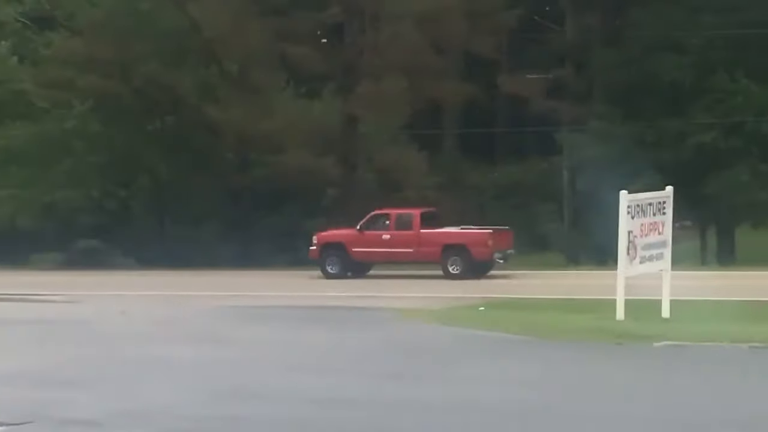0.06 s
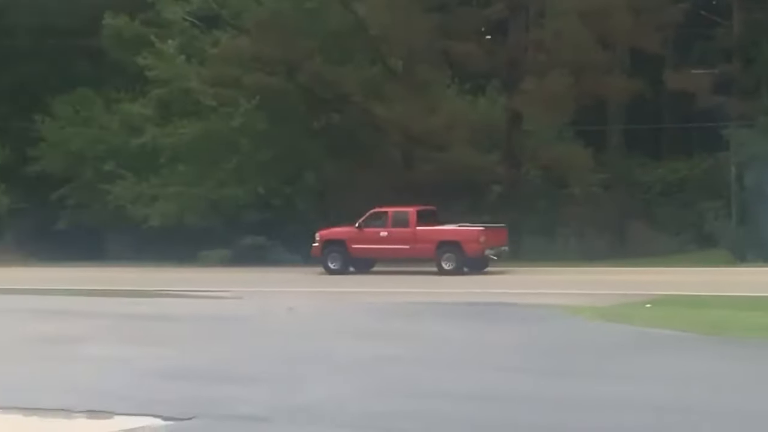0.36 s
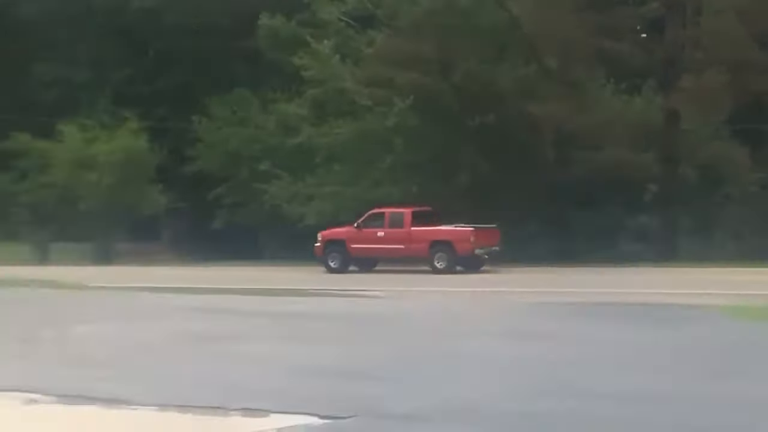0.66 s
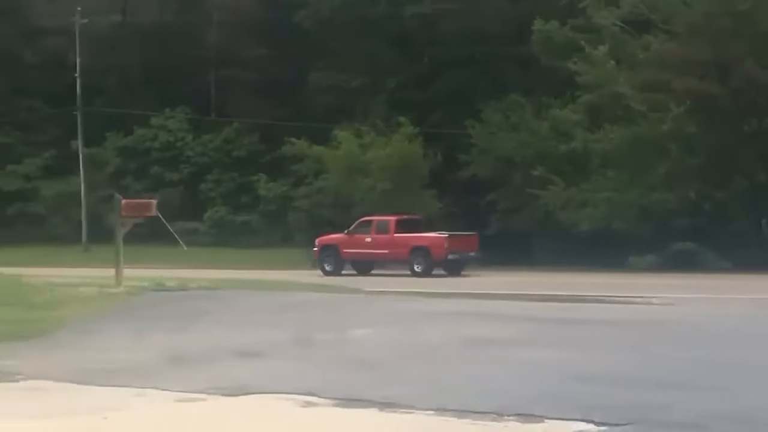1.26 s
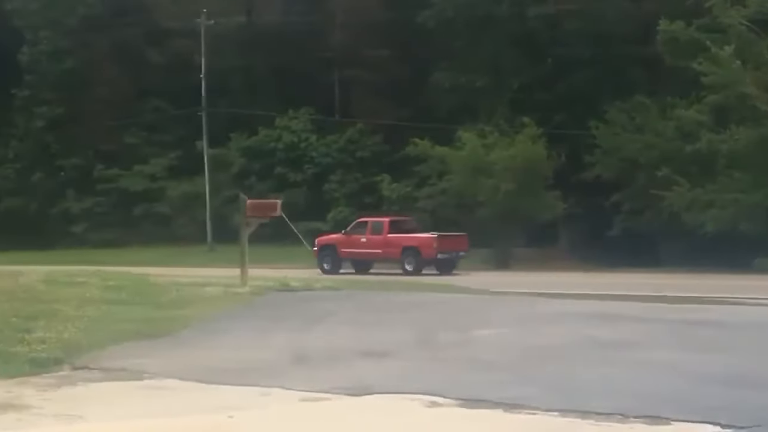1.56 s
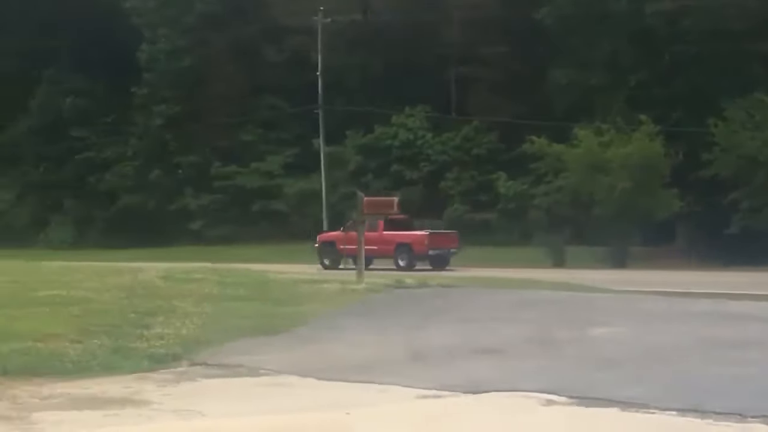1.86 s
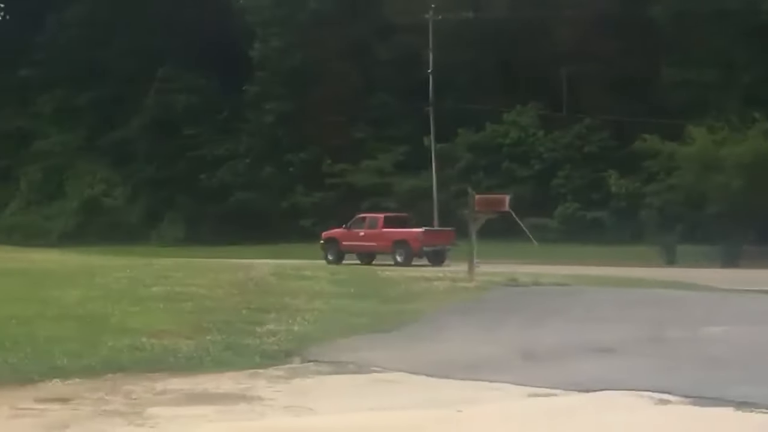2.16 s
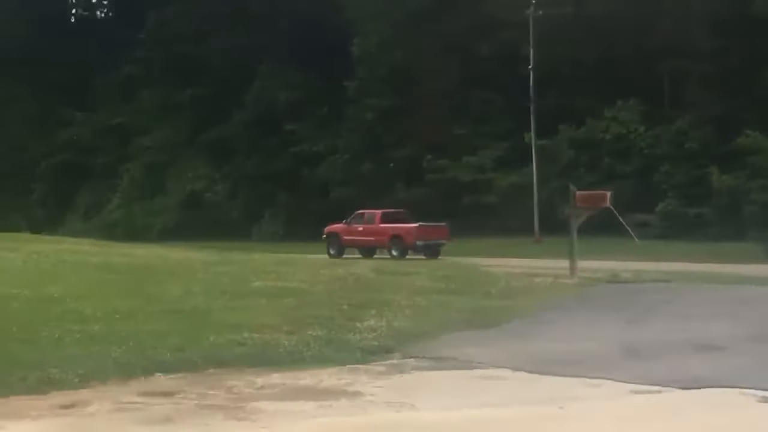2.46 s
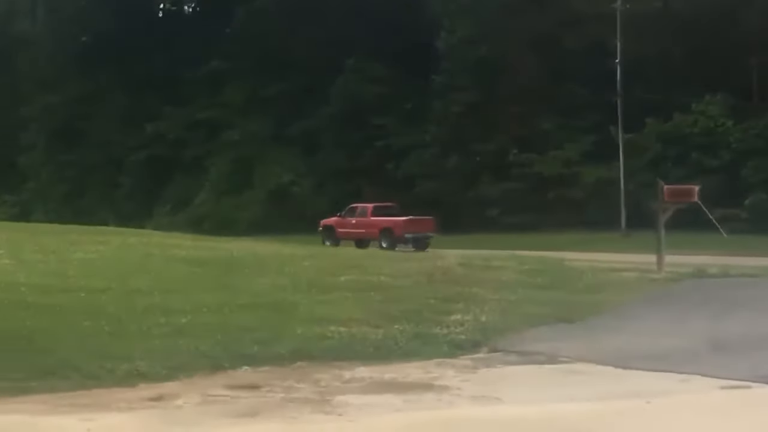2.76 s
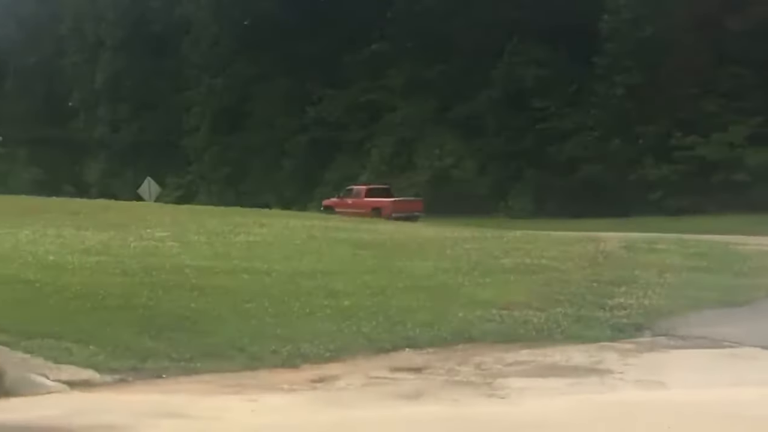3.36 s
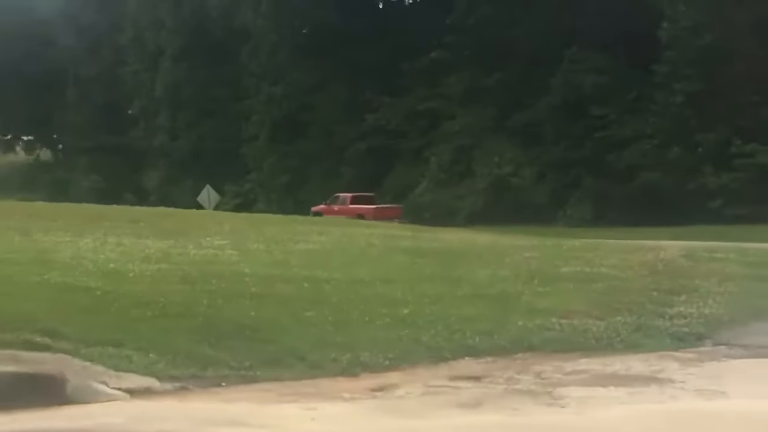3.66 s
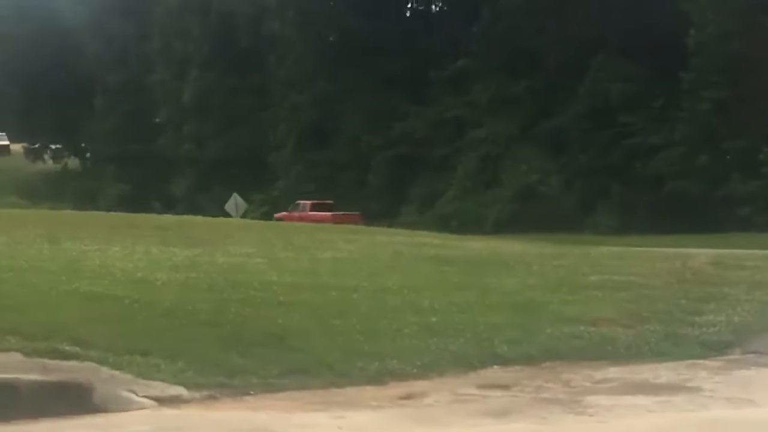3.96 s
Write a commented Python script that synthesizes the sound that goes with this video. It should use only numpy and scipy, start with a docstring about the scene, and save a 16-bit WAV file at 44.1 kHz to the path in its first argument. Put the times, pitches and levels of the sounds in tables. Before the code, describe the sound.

A pickup truck with a loud, rough exhaust drives past and fades away.

```python
"""The boom and bark of a V8 pickup's open exhaust, passing on a country road and away along a wood.
Eight uneven firings per cycle excite the resonances of the pipe and its mouth, and the strongest
pressure fronts steepen into cracks. Trees scatter the sound; tyres and exhaust gas hiss over a diffuse
roar and a low rumble. At 3.6 s the driver lifts off and the engine's pitch sags."""
import sys
import numpy as np
from scipy import signal
from scipy.fft import rfft, irfft, next_fast_len
from scipy.io import wavfile
from scipy.ndimage import uniform_filter1d

SR = 44100
rng = np.random.default_rng(int(sys.argv[2]) if len(sys.argv) > 2 else 0)


def file_out(sig):
    """Save sig as 16-bit WAV at sys.argv[1]."""
    # one column per channel
    cols = np.atleast_2d(sig).T
    # limit, then scale
    lim = np.clip(cols, -1, 1)
    pcm = np.round(lim * 32767).astype(np.int16)
    wavfile.write(sys.argv[1], SR, pcm)


N = 176400
TIME = np.arange(N) / SR
CYLINDER_COUNT = 8
TURN_AWAY_S = (1.6, 2.25)  # the truck shows its tail

# Course of the rasp. Each row: time in seconds, relative levels in dB of bark (and roar) and of hiss.
RASP_LEVELS = [(0, -22, -41.2), (0.15, -28, -41.5), (0.4, -19.5, -41.5), (0.65, -18.5, -41),
               (0.9, -18.5, -39.5), (1.15, -24, -37), (1.45, -27.5, -35.5), (1.8, -29.5, -37),
               (2.2, -32, -38), (2.6, -34, -39), (3, -34.5, -39), (3.5, -36, -42), (3.75, -37.5, -46.5),
               (4, -37.5, -45)]


def amp(db):
    """Decibels as an amplitude ratio."""
    return 10 ** (np.asarray(db) / 20)


def unit(x):
    """Normalisation to an rms of 1."""
    return x / np.sqrt(np.mean(x ** 2) + 1e-20)


def along(points, hz):
    """Interpolation of (Hz, value) points on a logarithmic frequency axis."""
    freqs, values = np.transpose(points)
    return np.interp(np.log(hz + 1), np.log(freqs + 1), values)


def curves(rows):
    """Linear interpolation, sample by sample, of each column after the time."""
    times, *columns = np.transpose(rows)
    return [np.interp(TIME, times, column) for column in columns]


def filtered(x, response):
    """Zero-phase filtering: the spectrum is multiplied by a frequency response."""
    size = next_fast_len(N + SR // 2)
    return irfft(rfft(x, size) * response(np.fft.rfftfreq(size, 1 / SR)), size)[:N]


def below(x, cutoff_hz, order):
    """Low-pass filtering, to half amplitude at the cutoff."""
    return filtered(x, lambda hz: 1 / (1 + (hz / cutoff_hz) ** order))


def ring(x, spectrum, size=16384):
    """Resonance: x drives a minimum-phase response of unit energy with this spectrum."""
    cepstrum = irfft(along(spectrum, np.fft.rfftfreq(size, 1 / SR)) * np.log(10) / 20)
    cepstrum[1:size // 2] *= 2
    cepstrum[size // 2 + 1:] = 0
    response = irfft(np.exp(rfft(cepstrum)))
    return signal.fftconvolve(x, response / np.linalg.norm(response))[:N]


def noise(spectrum):
    """Spectral shaping of white noise, at an rms of 1."""
    return unit(filtered(rng.standard_normal(N), lambda hz: amp(along(spectrum, hz))))


def pulses(times, db, spread_db, jitter_ms, half_width=8):
    """Cycle-to-cycle variation: band-limited impulses, each a little off in size and time."""
    size_error, time_error = rng.standard_normal((len(times), 2)).T
    times = times + jitter_ms * time_error / 1000
    sizes = -amp(db + spread_db * size_error)
    taps = np.floor(times * SR).astype(int)[:, None] + np.arange(1 - half_width, half_width + 1)
    offset = taps - times[:, None] * SR
    window = np.cos(np.pi * offset / (2 * half_width)) ** 2
    weights = sizes[:, None] * np.sinc(offset) * window * (taps >= 0)
    return np.bincount(np.maximum(taps, 0).ravel(), weights.ravel(), N)[:N]


def firings():
    """Periodic excitation: unequal cylinders make a pattern that repeats once per engine cycle."""
    # Engine speed. Each row: time in seconds, engine cycles per second.
    speed = [(0.0, 13.489), (0.4, 13.443), (1.1, 13.567), (1.7, 13.597), (2.45, 13.679), (3.1, 13.638),
             (3.48, 13.491), (3.6, 12.849), (3.74, 11.902), (4.0, 12.026)]
    # Cylinders in firing order. Each row: lag in ms, relative boom in dB side-on and from behind,
    # then lag in ms and relative boom in dB off throttle.
    cylinders = [(1.1, 4.2, 2.8, 2.5, 2.2), (.7, 8.4, 5, -.2, 1), (.2, 7.9, 3.4, 1.4, 2.4),
                 (-.5, 4, .9, 3.2, -3.1), (.4, -6.3, .1, -.2, -4.7), (.4, 5, 6.3, 1.7, 3.4),
                 (-.1, 4.4, 2.8, 4.5, -2.2), (.3, -10, -11.7, 1.7, -4.4)]
    # Their pressure fronts. Each row: relative bark in dB, relative crack in dB.
    fronts = [(3, 1), (-8.5, -14), (-21, -34), (-30.5, -34), (-7.5, -31), (-3.5, -10), (-22, -26),
              (-10, -30)]
    cycles = -.096 + np.cumsum(curves(speed)[0]) / SR
    firing = np.arange(int(cycles[-1] * CYLINDER_COUNT) + 1)
    cylinder = firing % CYLINDER_COUNT
    lag_ms, side_db, behind_db, lifted_lag_ms, lifted_db = np.array(cylinders)[cylinder].T
    times = np.interp(firing / CYLINDER_COUNT, cycles, TIME)
    away = np.interp(times, TURN_AWAY_S, (0, 1))
    lift = np.interp(times, (3.55, 3.64), (0, 1))  # the throttle closes
    loaded_db = (1 - away) * side_db + away * behind_db + 20 * np.log10(1.001 - lift)
    loaded = (times + lag_ms / 1000, loaded_db)
    lifted = (times + lifted_lag_ms / 1000, lifted_db + 20 * np.log10(lift + .001))
    return loaded, lifted, np.array(fronts)[cylinder].T


def boom(loaded, lifted):
    """Pipe resonance: the firings excite the low modes, heard in three registers of separate level."""
    # The pipe under load. Each row: frequency in Hz, relative gain in dB.
    hot_pipe = [(20, -93), (50, -40), (68, -35), (85, -61.5), (108, -37.5), (140, -34.5), (165, -20),
                (190, -33.5), (218, -37), (245, -39.5), (275, -40), (315, -49), (380, -67.5), (500, -65),
                (900, -92)]
    # The pipe off throttle, its gas cooler. Each row: frequency in Hz, relative gain in dB.
    cool_pipe = [(20, -69), (60, -54), (90, -63), (125, -46), (155, -40.5), (190, -25), (250, -42.5),
                 (320, -60), (390, -58), (900, -97)]
    # The registers. Each row: time in seconds, relative levels in dB of deep boom, upper boom and honk.
    register_levels = [(0, -19, -21, -26), (0.2, -19.5, -19.5, -23.5), (0.4, -21.5, -19.1, -25),
                       (0.65, -22.5, -15.9, -29.5), (1, -21.5, -15.5, -31), (1.5, -20.5, -17.5, -30),
                       (1.9, -19, -20.5, -27), (2.2, -19.5, -25.5, -27), (2.55, -20, -22, -29),
                       (2.85, -21, -19.5, -37.5), (3.1, -25.7, -18, -32), (3.35, -26, -17.5, -36.5),
                       (3.56, -30.4, -18.5, -27), (3.64, -34, -24, -31.5), (3.76, -24.5, -21, -34),
                       (4, -22.5, -19.5, -35)]
    wave = ring(pulses(*loaded, spread_db=0.88, jitter_ms=0.071), hot_pipe)
    wave += ring(pulses(*lifted, spread_db=1.8, jitter_ms=0.074), cool_pipe)
    wave = trees(wave, wet_db=-20.5, bass_t60_s=0.2)
    deep = below(wave, cutoff_hz=175, order=16)
    low = below(wave, cutoff_hz=264, order=16)
    honk = below(wave - low, cutoff_hz=800, order=6)
    honk = trees(honk, wet_db=-5, bass_t60_s=0.42)
    deep_db, upper_db, honk_db = curves(register_levels)
    return (steady(deep) * amp(deep_db - 1.5) + steady(low - deep) * amp(upper_db - 0.5)
            + steady(honk) * amp(honk_db - 2))


def steady(x):
    """Division by the running rms flattens the envelope."""
    return x / np.sqrt(abs(uniform_filter1d(x * x, size=6500)) + 1e-12)


def trees(x, wet_db, bass_t60_s, positions=9):
    """Scattering: the wood adds reverberation whose echo pattern changes as the truck moves."""
    # The wood's decay. Each row: frequency in Hz, reverberation time as a fraction of that in the bass.
    wood_decay = [(200, 1), (1500, 0.21), (6000, 0.081), (14000, 0.037)]
    out = x.copy()
    for position in range(positions):
        hz, t, spectra = signal.stft(rng.standard_normal(SR // 2), SR, nperseg=256)
        t60_s = bass_t60_s * along(wood_decay, hz)[:, None]
        tail = signal.istft(spectra * amp(-60 * t / t60_s), SR, nperseg=256)[1]
        crossfade = np.sqrt(np.clip(1 - abs(np.linspace(0, positions - 1, N) - position), 0, 1))
        out += amp(wet_db) * signal.fftconvolve(x * crossfade, tail / np.linalg.norm(tail))[:N]
    return out


def bark(times, db):
    """Radiation from the pipe's mouth: each front is hard when near, blurred by the trees when far."""
    # The mouth's response. Each row: frequency in Hz, relative gain in dB.
    mouth = [(150, -15.5), (350, -23), (490, -10), (600, -2), (680, 0), (800, -1), (900, -4.5),
             (1150, -1.5), (1650, -3), (2050, -12), (3000, -16.5), (5000, -28.5), (12000, -82)]
    # Scatter off the trees. Each row: time in seconds, scattered-to-direct ratio in dB.
    scatter_ratio = [(0, -8), (.9, -8), (1.4, -3), (2.1, 2), (3, 6), (4, 3)]
    away = np.interp(times, TURN_AWAY_S, (0, 1))
    jitter_ms = 0.019 + 0.086 * away  # moving air upsets the arrivals from afar
    fronts = pulses(times, db, spread_db=.5, jitter_ms=jitter_ms)
    wet_db = curves(scatter_ratio)[0]
    wave = trees(ring(fronts, mouth), wet_db, bass_t60_s=0.77) / np.hypot(1, amp(wet_db))
    return unit(wave) * amp(curves(RASP_LEVELS)[0] - 1.5)


def tailpipe(times, db):
    """Forced vibration: the firings keep one narrow resonance of the tailpipe singing."""
    # The resonance. Each row: frequency in Hz, relative gain in dB.
    narrow_peak = [(100, -57), (500, -38), (620, -23.5), (655, -2), (675, -3), (700, -3), (760, -9.5),
                   (900, -37), (3000, -90)]
    # Its course. Each row: time in seconds, level in dB.
    ring_levels = [(0, -23.5), (.15, -34.5), (.35, -25), (.8, -40), (1.2, -33.5), (1.7, -42), (2.3, -42.5),
                   (2.8, -36.5), (3.2, -43), (3.6, -59), (4, -57)]
    wave = ring(pulses(times, .5 * db, spread_db=4.0, jitter_ms=0.044), narrow_peak)
    return unit(trees(wave, wet_db=0.5, bass_t60_s=1.0)) * amp(curves(ring_levels)[0])


def cracks(times, db):
    """Shocks: the strongest fronts are heard steepened, each coloured differently by the moving body."""
    # Shock strength. Each row: time in seconds, relative level in dB.
    crack_levels = [(0, -10.5), (.08, -4.5), (.23, 1), (.3, -0.5), (.38, -3), (.45, -6.5), (.53, -4.5),
                    (.6, -8), (.68, -5), (.75, -9), (.82, -5.5), (.9, -4.5), (.97, -8.5), (1.04, -11),
                    (1.12, -10.5), (1.19, -18), (1.85, -20), (2.4, -22), (2.8, -36.5), (3.53, -26.5),
                    (3.62, -22.5), (4, -22.5)]
    # A shock's spectrum. Each row: frequency in Hz, relative level in dB.
    shock_spectrum = [(200, -1.5), (700, -1.5), (1150, 1), (1650, 4), (2050, -5.5), (2500, -1), (3250, 4),
                      (3800, -4.5), (4400, 5.5), (4900, 2.5), (5600, 3.5), (6600, 0.5), (7700, -13),
                      (8800, -5), (9900, -12.5), (11500, -10.5), (12400, -20.5), (14500, -23), (16500, -38)]
    fronts = pulses(times, db, spread_db=0.5, jitter_ms=0.057) * amp(curves(crack_levels)[0] + 8)
    shocks = ring(fronts, shock_spectrum)
    angles = rng.uniform(0, 2 * np.pi, len(times))
    blend = np.interp(TIME, times[::CYLINDER_COUNT], angles[::CYLINDER_COUNT])  # a new mix each cycle
    smear = np.cos(blend) * underbody(shocks) + np.sin(blend) * underbody(shocks)
    return trees(absorption(shocks + smear, far_db=-6), wet_db=-7, bass_t60_s=1.0)


def underbody(x, echo_db=-3, decay_ms=1, size=128):
    """Early reflections: road and bodywork smear each shock over about a millisecond."""
    echoes = rng.standard_normal(size) * np.exp(-np.arange(size) / SR * 1000 / decay_ms)
    return amp(echo_db) * signal.fftconvolve(x, echoes / np.linalg.norm(echoes))[:N]


def absorption(x, far_db, recede_s=(1.4, 5.2)):
    """Absorption by air and grass: the top treble falls towards far_db as the distance grows."""
    treble = x - below(x, cutoff_hz=9800, order=8)
    return x + treble * (amp(far_db * np.interp(TIME, recede_s, (0, 1))) - 1)


def roar():
    """Diffuse noise follows the bark's level and gains on it as the truck turns away."""
    # The roar's spectrum. Each row: frequency in Hz, relative level in dB.
    roar_spectrum = [(210, -48), (350, 5.5), (373, -6), (408, 5), (446, -18), (584, -2), (657, 0.5),
                     (924, -7), (1610, -6.5), (2110, -21), (3000, -27), (3900, -21), (6600, -120)]
    away = np.interp(TIME, TURN_AWAY_S, (0, 1))
    return noise(roar_spectrum) * amp(curves(RASP_LEVELS)[0] - 10.5 + 8.5 * away)


def hiss():
    """Broadband noise from exhaust gas and tyres, dulled by distance."""
    # The hiss's spectrum. Each row: frequency in Hz, relative level in dB.
    hiss_spectrum = [(880, -50), (1500, -4), (1610, 2), (2100, -5), (2340, -3.5), (3410, -9), (4460, -9.5),
                     (4870, -14), (5490, -10), (7690, -20.5), (9370, -19.5), (10500, -29.5), (11400, -29),
                     (14800, -39.5), (16000, -54)]
    return absorption(noise(hiss_spectrum), far_db=-14) * amp(curves(RASP_LEVELS)[1] + 1.5)


def rumble():
    """Low-frequency noise under a slow envelope fades and returns."""
    # The rumble's spectrum. Each row: frequency in Hz, relative level in dB.
    rumble_spectrum = [(20, -26), (45, -0.5), (70, 8.5), (150, 2), (300, -6), (500, -28), (1000, -46),
                       (3000, -120)]
    # Its course. Each row: time in seconds, level in dB.
    rumble_levels = [(0, -29.5), (1, -46), (1.5, -63), (2.55, -39), (2.78, -31), (3.05, -40), (4, -37)]
    return noise(rumble_spectrum) * amp(curves(rumble_levels)[0])


def scene():
    """Superposition: the truck's sounds add at the roadside."""
    loaded, lifted, (bark_db, crack_db) = firings()
    front_times = loaded[0] - 1.078 / 1000  # the steep front runs ahead of the boom
    exhaust = boom(loaded, lifted) + bark(front_times, bark_db) + tailpipe(front_times, bark_db)
    return (exhaust + cracks(front_times, crack_db) + roar() + hiss() + rumble())[None]


def record(dry):
    """Soft saturation rounds the highest peaks, and a band limit removes the extreme treble."""
    rounded = dry[0] / (1 + dry[0] ** 6) ** (1 / 6)
    return filtered(rounded, lambda hz: hz < 16200)[None]


dry = scene()
out = record(dry)
file_out(out)
```